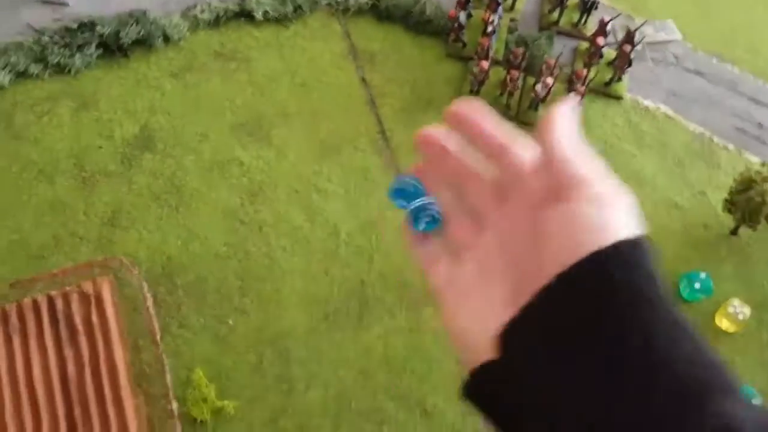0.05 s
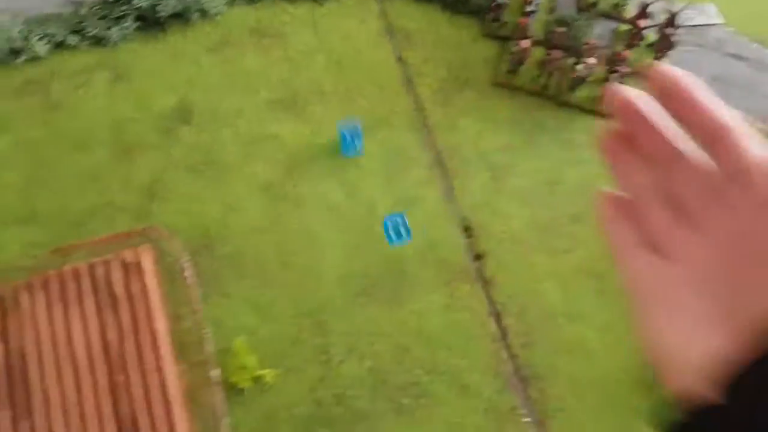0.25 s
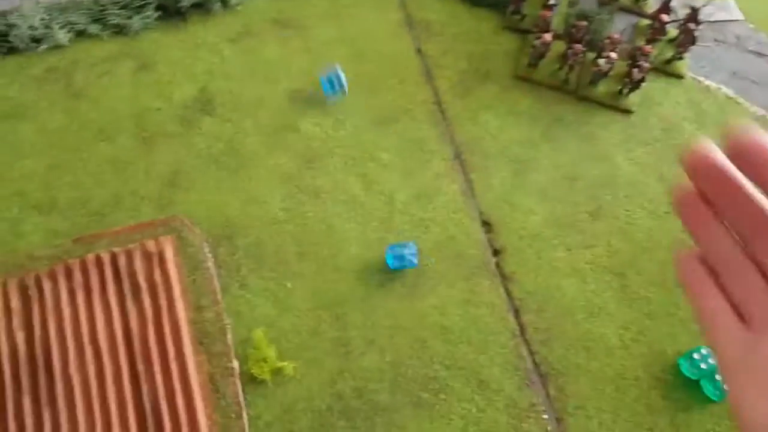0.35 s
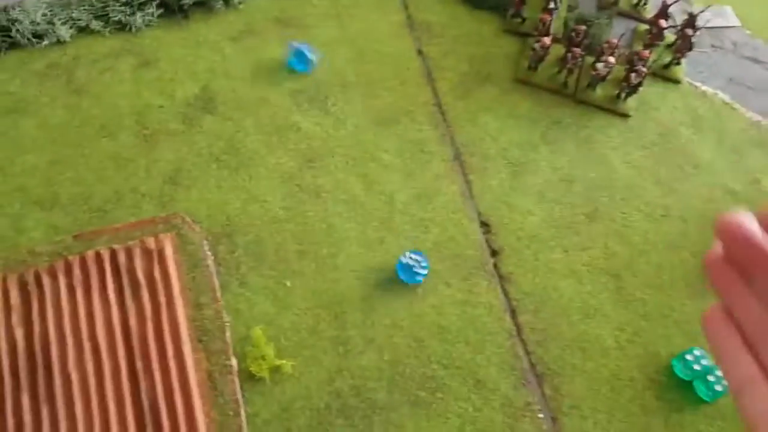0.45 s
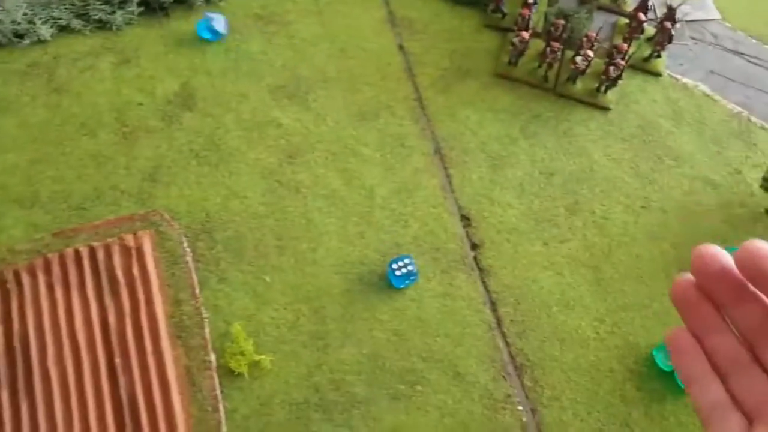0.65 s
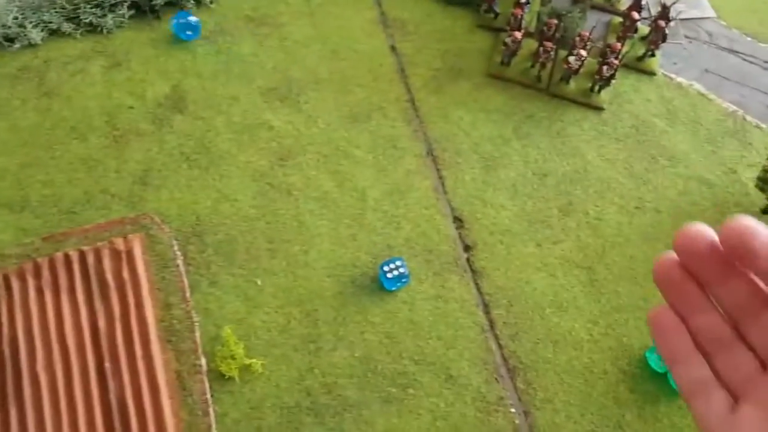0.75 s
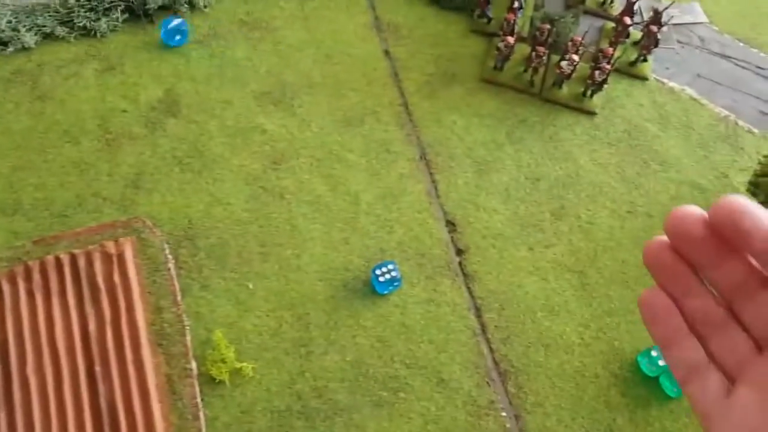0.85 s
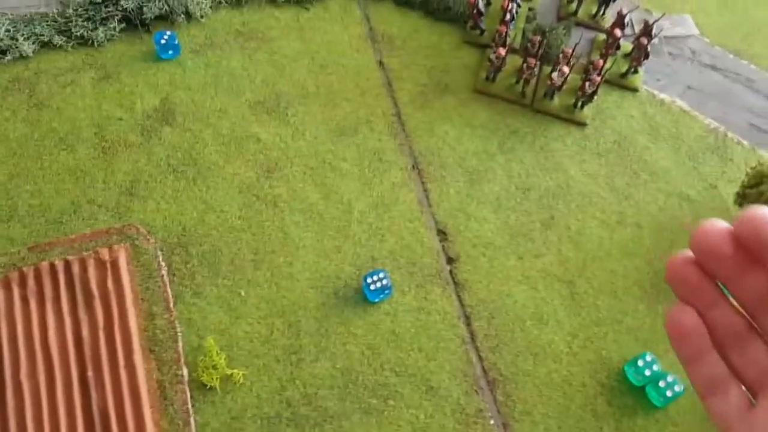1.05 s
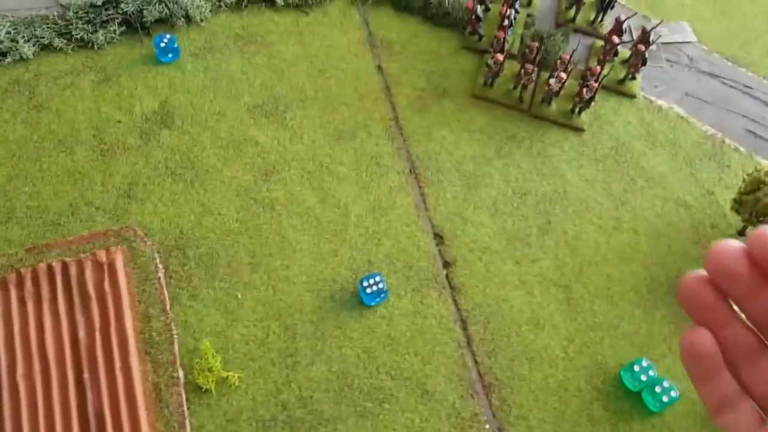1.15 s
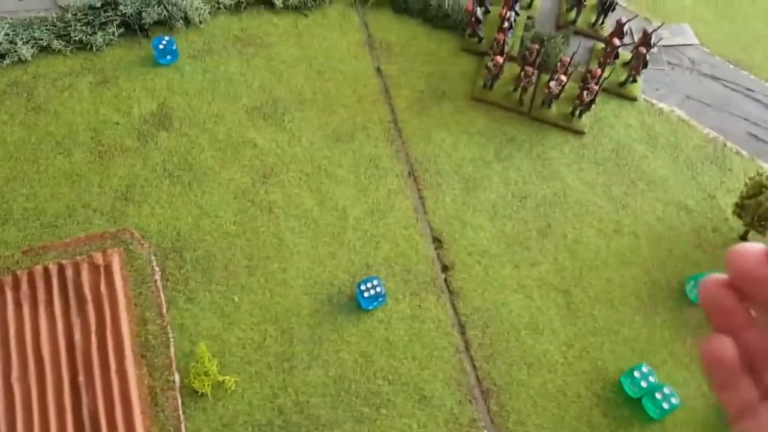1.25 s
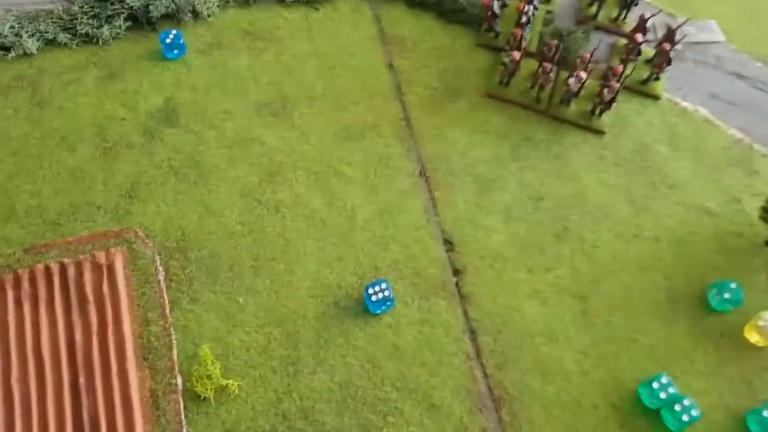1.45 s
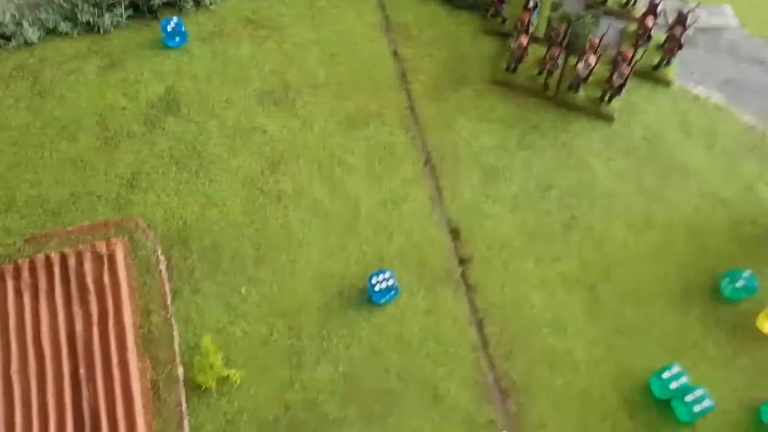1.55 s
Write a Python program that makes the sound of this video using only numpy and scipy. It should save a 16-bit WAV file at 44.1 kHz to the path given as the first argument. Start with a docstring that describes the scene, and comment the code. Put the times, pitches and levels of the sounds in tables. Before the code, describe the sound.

Two small plastic dice click in a hand, then thud and tumble onto a grassy mat

```python
"""Two plastic dice click in a hand, land on a grass mat over a wooden table, bounce and tumble to rest.
Each landing is a set of short fading tones, a noise tick and longer-lasting low tones.
Shaped noise makes the scuffed fibres, the dragging dice, the rustling sleeve and the quiet room's hush.
Sine waves make a low motor hum. A phone above hears it all through two ports, with a short room tail."""
import sys
import numpy as np
from scipy import signal
from scipy.fft import rfft, irfft
from scipy.io import wavfile
from scipy.ndimage import uniform_filter1d

SR = 44100
rng = np.random.default_rng(int(sys.argv[2]) if len(sys.argv) > 2 else 0)


def elevation(decibels):
    """Turn decibel levels (scalar or array-like) into linear amplitude ratios."""
    levels = np.asarray(decibels, float)
    return 10 ** (levels / 20)


def digitize_waveform(pressure):
    """Quantize a signal to 16-bit integers and store it at the path in sys.argv[1].

    Rows of a 2-D input are taken as channels; values are limited to [-1, 1].
    """
    field = np.atleast_2d(pressure).T
    bounded = np.clip(field, -1, 1)
    quanta = np.round(bounded * 32767).astype(np.int16)
    wavfile.write(sys.argv[1], SR, quanta)


N = 70560  # length [samples]
T = np.arange(N) / SR  # time of each sample [s]
F = np.maximum(np.fft.rfftfreq(2 * N, 1 / SR), 1)  # filter frequencies [Hz]

# tone colour of dice on the mat fibres, relative: (frequency [Hz], level per Hz [dB])
FIBRE_COLOUR = [(290, -32), (500, -16), (855, -27), (1550, -8), (2130, -5.5), (4730, -19), (6900, -19.5),
                (10100, -19), (14200, -17), (16000, -18)]


def read(points, hz):
    """Reads a (frequency [Hz], value) table along a logarithmic frequency axis."""
    table_hz, values = np.array(points).T
    return np.interp(np.log(hz), np.log(table_hz), values)


def colour(x, points, late_s=0.):
    """Filters a sound by a (frequency [Hz], level [dB]) table and delays it."""
    delay = np.exp(-2j * np.pi * F * late_s)
    return irfft(rfft(x, 2 * N) * elevation(read(points, F)) * delay)[..., :N]


def unit(x):
    """Scales a sound to an rms (average strength) of 1."""
    return x / np.sqrt(np.mean(x ** 2))


def fade(since_s, t60_s):
    """Dies away steadily, by 60 dB in each t60_s."""
    return np.exp(-np.log(1000) * since_s / t60_s)


def ring(at_s, hz, t60_s):
    """A struck object's tone: a sine that starts at at_s and dies away."""
    since_s = np.maximum(T - at_s, 0)
    return np.sin(2 * np.pi * hz * since_s) * fade(since_s, t60_s)


def walk(rate_hz):
    """Smooth random wander of rms 1: noise averaged twice over 1 / rate_hz."""
    width = int(SR / rate_hz)
    smooth = uniform_filter1d(rng.standard_normal(N), width)
    return unit(uniform_filter1d(smooth, width))


def diffuse():
    """Noise from all around: more alike at the two ports in the bass than in the treble."""
    mid, side = rng.standard_normal((2, N))
    share = np.maximum(F / np.hypot(F, 900), .2)  # the difference grows around 900 Hz
    side = irfft(rfft(side, 2 * N) * share)[:N]
    return np.array([mid + side, mid - side])


def landings():
    """Each blow sets off short tones, a tick and longer low tones; the mat softens the contact."""
    # landings: (time [s], deep thud [dB], thud [dB], tock [dB], clack [dB], tick [dB])
    blows = [(0.2024, -27.5, -14, -10, -14.5, -35), (0.256, -17.5, -20.5, -13.5, -8, -37),
             (0.3092, -28, -35.5, -45, -56, -42), (0.3845, -26.5, -23, -14.5, -23, -39),
             (0.394, -33, -37, -37, -39, -51), (.4270, -34, -47, -49, -32, -55),
             (0.4663, -30, -38.5, -34, -22, -53.5), (0.5079, -47, -44.5, -39, -50, -49),
             (.5770, -48, -53.5, -41, -52, -50.5)]
    # short tones, one group each for deep thud, thud, tock and clack:
    # (frequency [Hz], level added to the blow [dB], 60 dB fade [s], signed factor)
    blow_modes = [
        [(293, 4.5, 0.021, 0.82)],
        [(485.4, 1, .011, 1), (907, -8.5, 0.023, -0.6)],
        [(1652, 0.5, 0.0063, -0.91), (4750, -22, 0.012, -1)],
        [(2240, -0.5, 0.0044, -0.98), (3330, -23, 0.0084, -0.71), (6400, -21, 0.0072, -2)],
    ]
    # delay of each group, lower tones speaking later: (delay [s])
    group_delays = [.0008, .0005, 0, 0]
    # longer-lasting low tones after each landing:
    # (frequency [Hz], level added to the blow [dB], 60 dB fade [s])
    long_tones = [(159, -30, 0.3), (195.6, -24, .35), (224.2, -25, 0.45), (262, -16, 0.41), (315, -47, .3),
                  (362.5, -21, 0.24), (429.6, -21.5, 0.13), (512, -19.5, 0.26), (609, -25.5, 0.31),
                  (745, -24.5, 0.17), (1017, -30, 0.17)]
    # colour of the tick, relative: (frequency [Hz], level per Hz [dB])
    tick_colour = [(1000, -22), (3000, -8), (6000, 6), (10000, -0.5), (15000, -3.5)]
    long_late_s, contact_s, tick_t60_s = .0015, 0.00022, 0.0071

    body, ticks, noise = np.zeros(N), np.zeros((2, N)), diffuse()
    # the level of each long tone varies by chance from landing to landing
    chances = rng.standard_normal((len(blows), len(long_tones)))
    thud_hz = [blow_modes[0][0][0], blow_modes[1][0][0]]
    for (at_s, *levels_db, tick_db), blow_chances in zip(blows, chances):
        for level_db, group, late_s in zip(levels_db, blow_modes, group_delays):
            for hz, mode_db, t60_s, sign in group:
                body += sign * elevation(level_db + mode_db) * ring(at_s + late_s, hz, t60_s)
        ticks += elevation(tick_db) * noise * (T >= at_s) * fade(np.maximum(T - at_s, 0), tick_t60_s)
        for (hz, long_db, t60_s), chance in zip(long_tones, blow_chances):
            # the long tones follow the two thud levels, blended by frequency
            thud_db = np.interp(np.log(hz), np.log(thud_hz), levels_db[:2])
            body += elevation(long_db + thud_db + 2.6 * chance) * ring(at_s + long_late_s, hz, t60_s)
    soften = np.exp(-(np.pi * F * contact_s / 4) ** 2)  # a longer contact dulls the treble
    return irfft(rfft(body, 2 * N) * soften)[:N] + colour(ticks, tick_colour)


def clicks():
    """Hard plastic faces knock together in the hand: two very short rings for each click."""
    # die against die: (time [s], level [dB], upper ring [Hz])
    knocks = [(.0022, -38.5, 6000), (0.0118, -43, 6000), (0.014, -50, 6000), (0.0406, -27.5, 8030),
              (0.0883, -39, 6000), (.0912, -47, 5500), (0.0999, -34.5, 6560)]
    total = np.zeros(N)
    for at_s, level_db, hz in knocks:
        low = elevation(-17) * ring(at_s, 2650, 0.006)
        high = ring(at_s, hz, 0.0013)
        total += elevation(level_db) * (low - high)
    return total


def brush(events, spectrum):
    """Fibres flicked in short bursts: noise that swells and dies quickly, with a grainy level."""
    envelope = np.zeros(N)
    for peak_s, level_db, rise_s, fall_s in events:
        rise = np.exp(np.minimum(T - peak_s, 0) / rise_s)
        fall = np.exp(-np.maximum(T - peak_s, 0) / fall_s)
        envelope += elevation(level_db) * np.where(T < peak_s, rise, fall)
    grain = elevation(3 * walk(1500))
    return envelope * unit(colour(diffuse(), spectrum)) * grain


def scuffs():
    """Tumbling dice scuff the mat, flicking its fibres."""
    # tumbles: (time of peak [s], level before grain [dB], rise [s], fall [s])
    tumbles = [(.205, -37, 0.0011, 0.0024), (.312, -41.5, 0.0042, 0.0024), (.394, -42, 0.0015, 0.0009),
               (.428, -41, 0.0014, 0.0023), (.453, -55, .001, 0.0012), (.461, -49, 0.0038, 0.0045),
               (.491, -51.5, 0.0026, 0.0062), (.510, -59, .005, 0.011), (.547, -52, 0.0023, 0.0026),
               (.555, -57, 0.0066, .005), (.600, -57, 0.0057, 0.0023), (.609, -48, 0.0028, 0.0041),
               (.619, -52, 0.0022, 0.0036), (.637, -53.5, 0.0014, 0.0015), (.668, -56.5, 0.0087, 0.0059),
               (.678, -57.5, 0.0037, .004), (.740, -52.5, 0.0062, 0.004)]
    return brush(tumbles, FIBRE_COLOUR)


def creases():
    """The sleeve creases in short bursts of cloth noise."""
    # creases: (time of peak [s], level before grain [dB], rise [s], fall [s])
    folds = [(.938, -53.5, 0.0065, 0.0095), (1.014, -62.5, 0.024, 0.02), (1.04, -67, 0.0091, .006),
             (1.127, -70, .002, 0.0024)]
    # colour of the creasing cloth, relative: (frequency [Hz], level per Hz [dB])
    fold_colour = [(400, -36), (900, -18), (1500, -11.5), (2100, 1), (2900, -9.5), (3600, -5),
                   (5000, -15.5), (8500, -19), (11600, -11.5), (16000, -21)]
    return brush(folds, fold_colour)


def rustle(curve, spectrum, flicker_db):
    """Cloth, skin or fibres rub: coloured noise follows a level curve and flickers a little."""
    times_s, levels_db = np.array(curve).T
    level_db = np.interp(T, times_s, levels_db, left=-120) + flicker_db * walk(60)
    return elevation(level_db) * unit(colour(diffuse(), spectrum))


def drag():
    """Dice drag over the fibres as they roll, then the sleeve slides: a flickering hiss."""
    # hiss before flicker: (time [s], level [dB])
    drag_curve = [(.2, -86), (.3, -88), (.42, -79), (.5, -68), (.6, -65.5), (.68, -75), (.71, -87),
                  (.92, -85), (.96, -78), (1.04, -77), (1.08, -82.5)]
    return rustle(drag_curve, FIBRE_COLOUR, flicker_db=3.0)


def sleeve_and_hand():
    """Sleeve and hand rustle as they move: rubbing noise."""
    # rustle before flicker: (time [s], level [dB])
    rustle_curve = [(0, -58.5), (.06, -63), (.13, -65.5), (.19, -69), (.3, -52.5), (.42, -62.5),
                    (.55, -62.5), (.67, -68), (.71, -63), (.9, -76.5), (1.0, -73), (1.2, -72), (1.4, -75),
                    (1.6, -75.5)]
    # colour of the rustle, relative: (frequency [Hz], level per Hz [dB])
    rustle_colour = [(120, -64), (200, -12), (235, -7.5), (422, -2), (844, -10), (1080, -9.5), (1980, -4),
                     (4730, -19), (14000, -31.5)]
    return rustle(rustle_curve, rustle_colour, flicker_db=1.27)


def dull_cloth():
    """Cloth moves with a duller rubbing noise."""
    # dull movement before flicker: (time [s], level [dB])
    dull_curve = [(0.7, -86), (0.912, -68), (0.92, -90), (0.944, -65.5), (1.096, -88), (1.188, -69),
                  (1.448, -89.5), (1.548, -75), (1.6, -92)]
    # colour of the dull cloth, relative: (frequency [Hz], level per Hz [dB])
    dull_colour = [(250, -23), (450, 3), (600, 3.5), (1000, 3), (1400, -27)]
    return rustle(dull_curve, dull_colour, flicker_db=2.0)


def room(x):
    """The room returns dense reflections: a noise tail whose half-octave bands fade at their own rates."""
    # strength of the tail, relative: (frequency [Hz], level per Hz [dB])
    tail_colour = [(100, 1), (180, -2.5), (300, -3), (450, 3.5), (700, -2), (1100, -6.5), (1600, -13),
                   (2400, -12), (3200, -6.5), (4500, -8.5), (8000, -11.5), (15000, -12)]
    # fading of the tail: (frequency [Hz], 60 dB fade [s])
    tail_fade = [(100, 0.88), (300, 0.86), (700, 0.32), (1500, 0.37), (3000, 0.29), (8000, 0.29)]
    tail_db, gap_s = -6.5, 0.0061  # overall level, and wait before the first reflection
    spectrum, tail = rfft(diffuse(), 2 * N), 0
    since_s = np.maximum(T - gap_s, 0)
    for hz in 70 * 2 ** np.arange(0, 8.5, .5):
        share = np.clip(1 - 2 * np.abs(np.log2(F / hz)), 0, 1)
        band = irfft(spectrum * share)[:, :N]
        t60_s = read(tail_fade, hz)
        evened = np.sqrt(t60_s * SR / 14)  # longer tails would otherwise be stronger
        tail = tail + band * elevation(read(tail_colour, hz)) * fade(since_s, t60_s) / evened
    return elevation(tail_db) * signal.fftconvolve(tail * (T > gap_s), x[None], axes=1)[:, :N]


def motor_hum():
    """A distant motor hums: sines at multiples of its wandering shaft rate, their levels drifting."""
    # multiples of the shaft rate: (multiple, peak level before drift [dB])
    multiples = [(3, -63.5), (4, -68.5), (6, -80.5)]
    shaft_hz = 24.94 + 0.45 * walk(5)
    turn = 2 * np.pi * np.cumsum(shaft_hz) / SR
    starts = rng.uniform(0, 2 * np.pi, len(multiples))
    hum = np.zeros((2, N))
    for (multiple, level_db), start in zip(multiples, starts):
        # the second drift moves the two ports in opposite directions
        drift_db = 2.0 * walk(7.5) + 1.4 * walk(6.8) * np.array([[1], [-1]])
        hum += elevation(level_db + drift_db) * np.sin(round(multiple) * turn + start)
    return hum


def air():
    """The room's hush: coloured noise with a slowly drifting level."""
    # colour of the hush, relative: (frequency [Hz], level per Hz [dB])
    hush_colour = [(15, -14), (30, 2), (45, -9), (62, -2), (90, -1.5), (130, -1.5), (200, 2), (300, -5.5),
                   (500, -9), (2280, -22), (4490, -25), (14800, -29.5), (16000, -36)]
    return elevation(-72 + 2.1 * walk(6.5)) * unit(colour(diffuse(), hush_colour))


def shaded(x):
    """The phone body shades the right port, which also hears late."""
    # loss at the right port: (frequency [Hz], level [dB])
    shade = [(200, 0), (500, -1.5), (1000, -6), (2000, -10), (4000, -6), (8000, -6), (15000, -6)]
    return colour(x, shade, late_s=.00018)


def scene():
    """Adds the near sounds at both ports, their room tail, the rustles and the background."""
    # soft upper limit for the near sounds and hand clicks: (frequency [Hz], level [dB])
    high_cut = [(15800, 0), (16500, -40)]
    hand = colour(clicks(), high_cut)
    near = colour(landings() + scuffs() + creases(), high_cut)
    # bass cut that thins the near sounds: the same 173 Hz cut twice
    low_cut = signal.butter(2, 173, "high", fs=SR, output="sos")
    near = signal.sosfilt(low_cut, signal.sosfilt(low_cut, near))
    wide = room(near[0] + elevation(-15) * hand)
    wide = wide + sleeve_and_hand() + drag() + dull_cloth()
    left = near[0] + hand + wide[0]
    right = shaded(near[1]) + elevation(-8) * hand + elevation(-2.5) * wide[1]
    return np.array([left, right]) + air() + motor_hum()


def band_limit(x):
    """A steep low-pass at the top of the band."""
    return signal.sosfilt(signal.butter(12, 16490, fs=SR, output="sos"), x)


def record(dry):
    """Passes on the finished mix as the phone stores it."""
    return band_limit(dry)


dry = scene()
out = record(dry)
digitize_waveform(out)
```